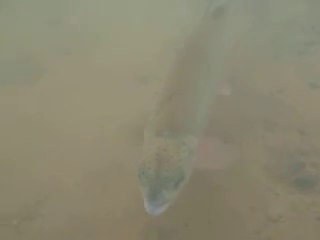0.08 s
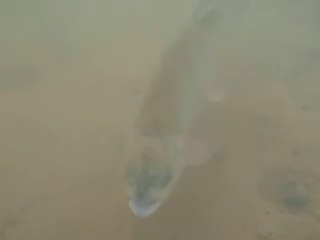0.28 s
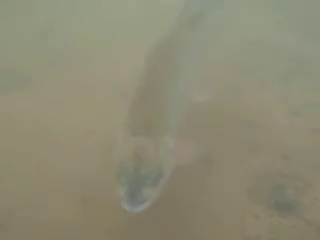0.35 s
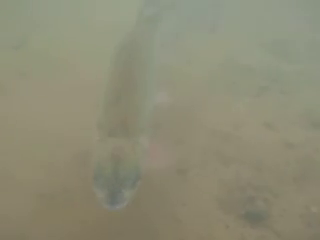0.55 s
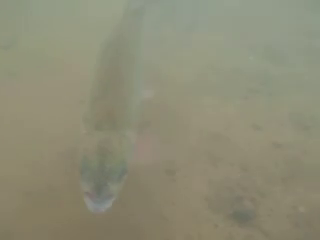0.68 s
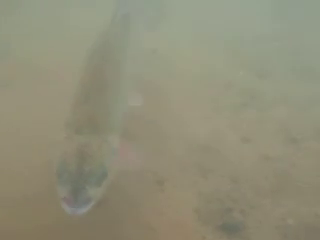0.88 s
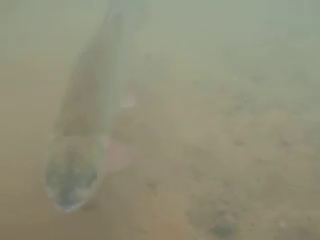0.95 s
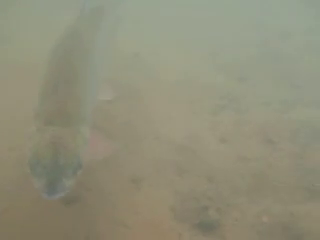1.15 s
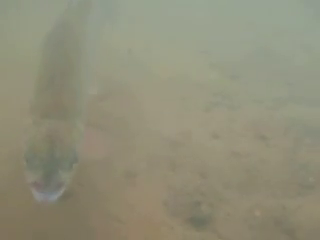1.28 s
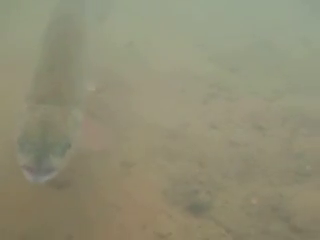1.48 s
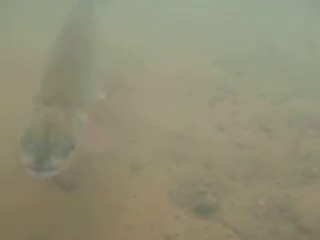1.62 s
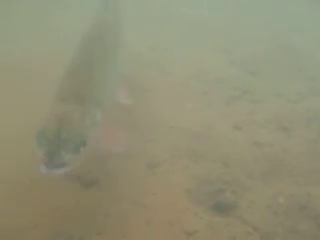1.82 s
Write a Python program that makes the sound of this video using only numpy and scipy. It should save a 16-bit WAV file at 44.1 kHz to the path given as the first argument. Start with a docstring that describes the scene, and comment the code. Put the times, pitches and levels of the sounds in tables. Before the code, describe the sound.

One sharp knock on an underwater camera housing, then a faint gritty buzz.

```python
"""A grip rubs on the housing of an underwater camera, heard very close from the microphone inside.
The rub swells, with a few light taps and ticks, into one sharp knock that overloads the recorder.
Afterwards only a faint wavering drone, the low rumble and swirl of the water outside and some hiss
remain, so quiet that they just flip the lowest step of the 8-bit converter and become a gritty buzz."""
import sys
import numpy as np
from scipy import signal
from scipy.fft import rfft, irfft
from scipy.io import wavfile

SR = 44100
rng = np.random.default_rng(int(sys.argv[2]) if len(sys.argv) > 2 else 0)


def wrap_up_sound(samples):
    """Save the sound to the file named by the first command line argument, as 16-bit audio."""
    columns = np.atleast_2d(samples).T
    # keep every value between -1 and 1, then stretch to whole-number steps
    tamed = np.clip(columns, -1, 1)
    steps = np.round(tamed * 32767).astype(np.int16)
    wavfile.write(sys.argv[1], SR, steps)


N = 81585
TIME = np.arange(N) / SR

# the grip rubbing on the housing: (time [s], groan level [dB])
RUB_LEVELS = [(0, -49), (.085, -49), (.098, -40.5), (.135, -42), (.165, -42), (.185, -37.5), (.205, -36.5),
              (.218, -31), (.228, -42), (.255, -77.5)]
# the faint drone in the background: (time [s], pitch [Hz], level [dB])
DRONE_CURVE = [(0, 390, -55.5), (.3, 365.8, -63.5), (.47, 398, -61), (.75, 392, -58.5), (1.03, 390, -62),
               (1.15, 360, -63.5), (1.85, 358, -63.5)]
# rumble of the water around the housing: (time [s], level [dB])
RUMBLE_LEVELS = [(0, -52), (.2, -52), (.3, -73), (.72, -74), (.87, -71), (1.0, -70), (1.15, -65.5),
                 (1.4, -66), (1.85, -62.5)]
# spectrum of the water's steady wash: (frequency [Hz], relative density [dB])
WASH_SPECTRUM = [(30, -4), (150, -1), (300, 0), (520, 3), (750, -6.5), (1100, -14), (2000, -19),
                 (4000, -25)]
# light taps on the housing: (time [s], low ring gain [dB], clack gain [dB])
HOUSING_TAPS = [(0.1150, -45, -28), (0.1716, -31, -18.5), (0.2195, -16, -34), (0.2538, -52.5, -37)]
# housing modes, the low ring first, then the clack: (frequency [Hz], relative level [dB], t60 [s])
HOUSING_MODES = [(391, 1, .029), (490, -7, 0.019), (650, 0.5, .010)]
# hard contacts of the grip: (time [s], gain [dB])
GRIP_TICKS = [(0.1726, -23), (0.2200, -36.5), (0.22728, -9.5)]
# modes of a hard contact: (frequency [Hz], relative level [dB], t60 [s])
TICK_MODES = [(1500, -6, 0.0053), (2124, -1, .007)]
# the knock shoves the housing and stops it: (time [s], pressure step [dB], direction [+/-1], rise [s])
KNOCK_STEPS = [(0.2279, 3.0, 1, .00020), (0.2321, 4.6, -1, .00018)]
# soft swirls against the housing: (time [s], length [s], centre [Hz], level [dB])
WATER_SWIRLS = [(0.87, .04, 70, -59), (0.959, .09, 680, -61), (1.089, .04, 160, -60), (1.495, .05, 55, -58),
                (1.645, .04, 55, -58)]


def from_db(db):
    """Decibels to gain."""
    return 10 ** (np.asarray(db) / 20)


def rms_one(x):
    """Scale to an rms of one."""
    return x / np.sqrt(np.mean(np.abs(x) ** 2) + 1e-20)


def in_time(rows):
    """Join the rows of a curve by straight lines, one track per column after the time."""
    times, *columns = np.transpose(rows)
    return [np.interp(TIME, times, column) for column in columns]


def shaped_noise(gain_at):
    """Noise whose spectrum follows a function of frequency; rms 1."""
    hz = np.maximum(np.arange(N // 2 + 1) * SR / N, 1)
    return rms_one(irfft(rfft(rng.standard_normal(N)) * gain_at(hz), N))


def resonant_noise(centre_hz, half_width_hz):
    """Noise through a resonance applied twice, so that its skirts are steep."""
    return shaped_noise(lambda hz: 1 / (1 + ((hz ** 2 - centre_hz ** 2) / (2 * hz * half_width_hz)) ** 2))


def wavering_tone(hz, half_width_hz, unsteady):
    """A narrow tone of drifting phase, from even in strength (0) to fully fluctuating (1); rms 1."""
    real, imag = [shaped_noise(lambda f: 1 / (1 + (f / half_width_hz) ** 2)) for _ in range(2)]
    waver = (real + 1j * imag) * np.hypot(real, imag) ** (unsteady - 1)
    carrier = np.exp(2j * np.pi * np.cumsum(hz * np.ones(N)) / SR)
    return rms_one(np.real(waver * carrier))


def rub():
    """The grip slides right by the microphone: the housing groans over dull thuds and a little scrape."""
    level_db, = in_time(RUB_LEVELS)
    groan = wavering_tone(hz=403, half_width_hz=68, unsteady=.7)
    thuds = from_db(-5) * resonant_noise(centre_hz=138.07, half_width_hz=55)
    scrape = from_db(-20) * resonant_noise(centre_hz=1637, half_width_hz=900)
    return from_db(level_db) * (groan + thuds + scrape)


def drone():
    """A faint narrow tone in the background wavers in strength and pitch."""
    hz, level_db = in_time(DRONE_CURVE)
    return from_db(level_db) * wavering_tone(hz, half_width_hz=36, unsteady=1)


def water():
    """Water moving around the housing gives a low rumble and a soft steady wash."""
    points_hz, points_db = np.transpose(WASH_SPECTRUM)
    wash = shaped_noise(
        lambda hz: from_db(np.interp(np.log(hz), np.log(points_hz), points_db)) * (hz < 4000))
    rumble_db, = in_time(RUMBLE_LEVELS)
    rumble = resonant_noise(centre_hz=55.98, half_width_hz=32)
    return from_db(rumble_db) * rumble + from_db(-67.5) * wash


def ring(start, modes, contact_s):
    """Damped modes set ringing by one contact, building up over contact_s."""
    age = np.maximum(TIME - start, 0)
    tones = sum(from_db(np.maximum(db - 60 * age / t60, -200)) * np.sin(2 * np.pi * hz * age)
                for hz, db, t60 in modes)
    build_up = 1 - np.exp(-(age / contact_s) ** 2)
    return tones * build_up


def taps():
    """Each tap sounds the housing's low ring and its clack in a balance of its own."""
    contact_s = .0008
    return sum(from_db(ring_db) * ring(start, HOUSING_MODES[:1], contact_s)
               + from_db(clack_db) * ring(start, HOUSING_MODES[1:], contact_s)
               for start, ring_db, clack_db in HOUSING_TAPS)


def ticks():
    """Hard contacts of the grip each give a brief bright tick, close up."""
    return sum(from_db(db) * ring(start, TICK_MODES, contact_s=.00022) for start, db in GRIP_TICKS)


def knock():
    """Two opposite pressure steps; the microphone lets each leak away in one heavily damped low swing."""
    pressure = sum(direction * from_db(db) * .5 * (1 + np.tanh(2 * (TIME - at) / rise))
                   for at, db, direction, rise in KNOCK_STEPS)
    settle_hz, damping = 80.1, .70
    omega = 2 * np.pi * settle_hz
    highpass = signal.bilinear([1, 0, 0], [1, 2 * damping * omega, omega ** 2], SR)
    return signal.lfilter(*highpass, pressure)


def swirls():
    """Water swells briefly and softly against the housing."""
    return sum(from_db(db) * np.exp(-(2 * (TIME - at) / length) ** 2) * resonant_noise(hz, .4 * hz)
               for at, length, hz, db in WATER_SWIRLS)


def scene():
    """Under water, everything reaches one microphone inside the housing."""
    return (rub() + drone() + water() + taps() + ticks() + knock() + swirls())[None]


def record(dry):
    """A low-rate 8-bit converter rounds down and overloads; its smoothed output clips once more."""
    full_scale, steps = .707, 128   # steps on each side of zero
    hop = 5   # the converter runs at 8820 Hz
    smoothing_hz, cutoff_hz = 4000, 16000
    # rounding down makes even the faintest sound flip between codes 0 and -1
    codes = np.clip(np.floor(dry[0, ::hop] / full_scale * steps), -steps, steps - 1)
    smoothing = signal.firwin(181, smoothing_hz, window=("kaiser", 8), fs=SR)
    smoothed = signal.resample_poly(codes / steps, hop, 1, window=smoothing)[:N]
    clipped = full_scale * np.clip(smoothed, -1, 1)
    lowpass = signal.cheby2(12, 70, cutoff_hz, fs=SR, output="sos")
    return signal.sosfilt(lowpass, clipped)[None]


dry = scene()
out = record(dry)
wrap_up_sound(out)
```